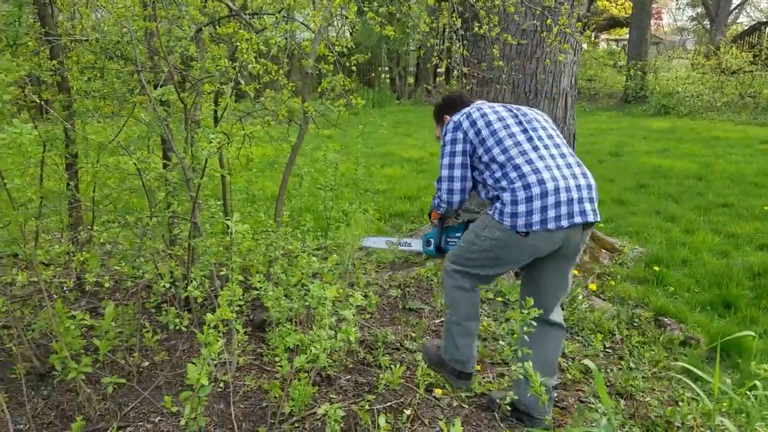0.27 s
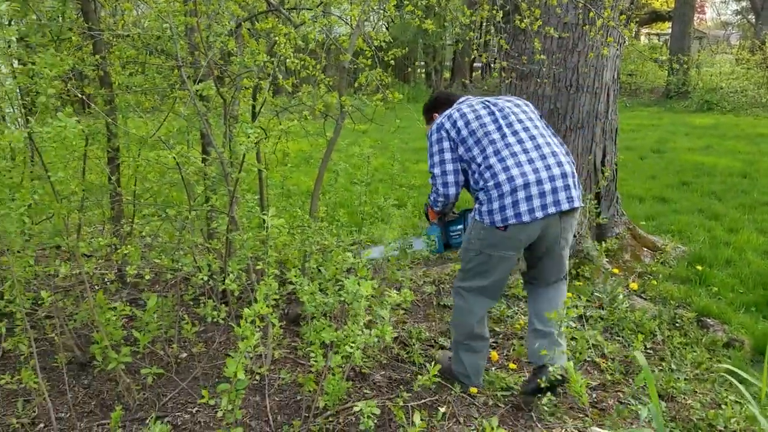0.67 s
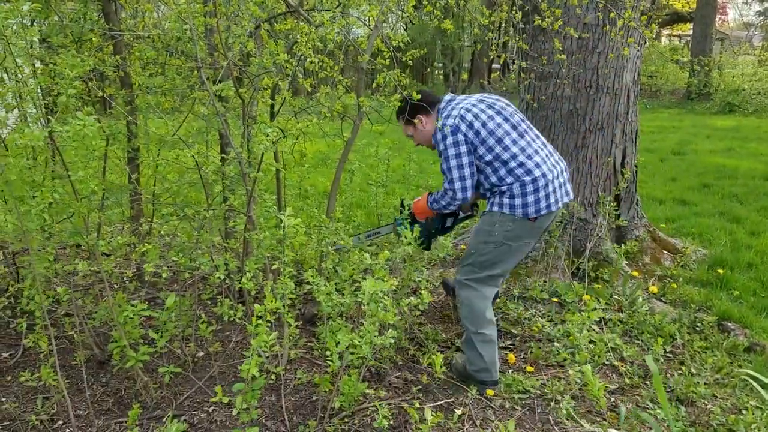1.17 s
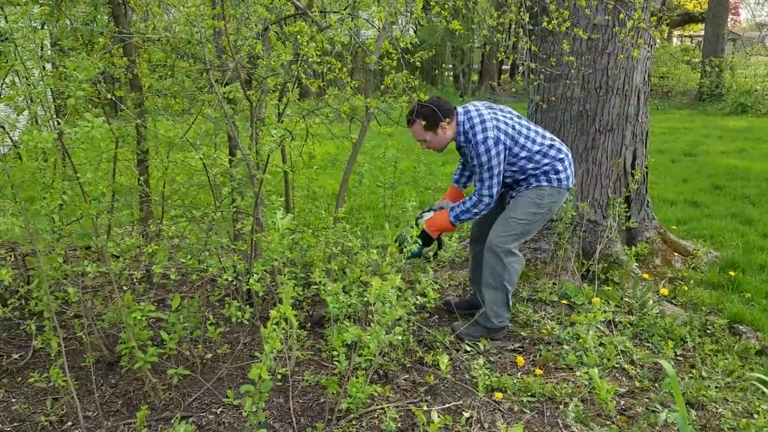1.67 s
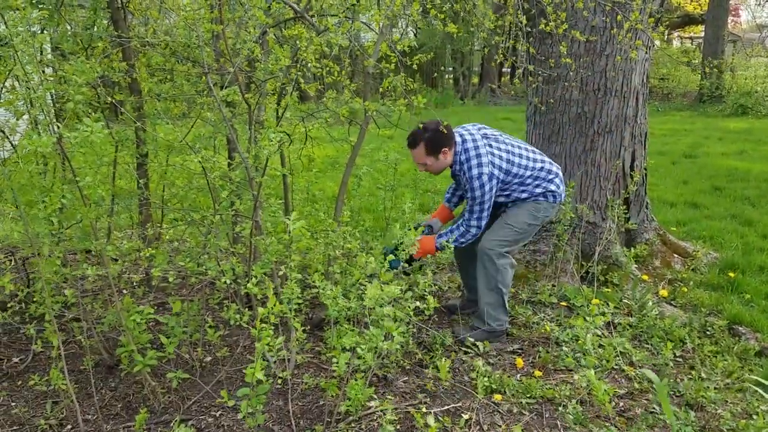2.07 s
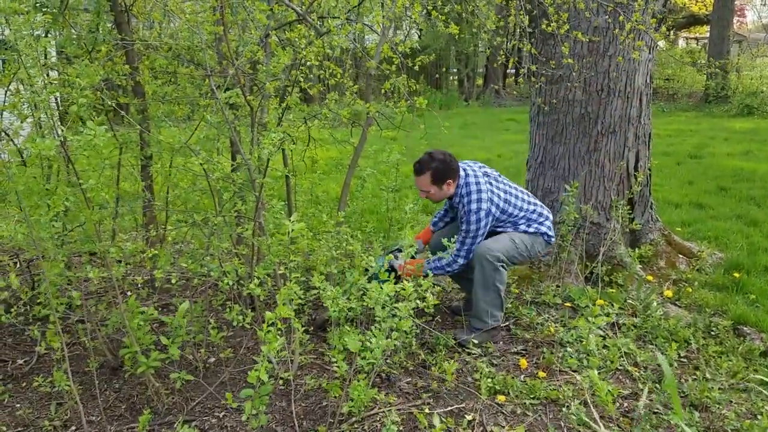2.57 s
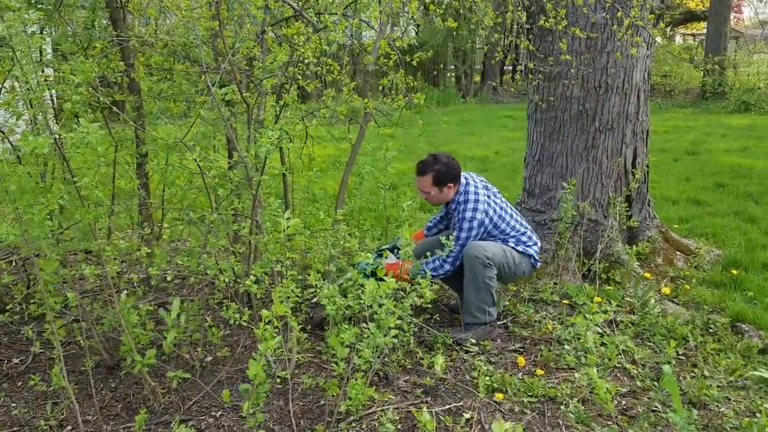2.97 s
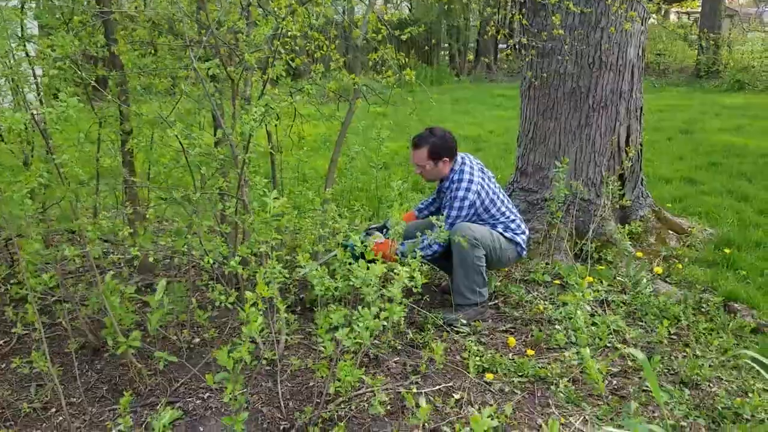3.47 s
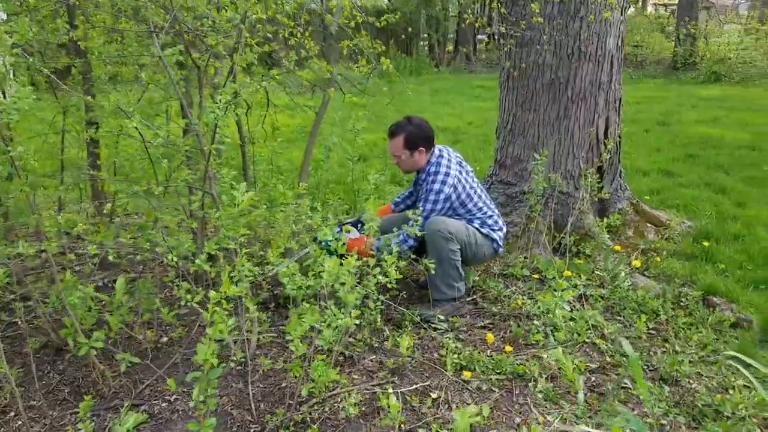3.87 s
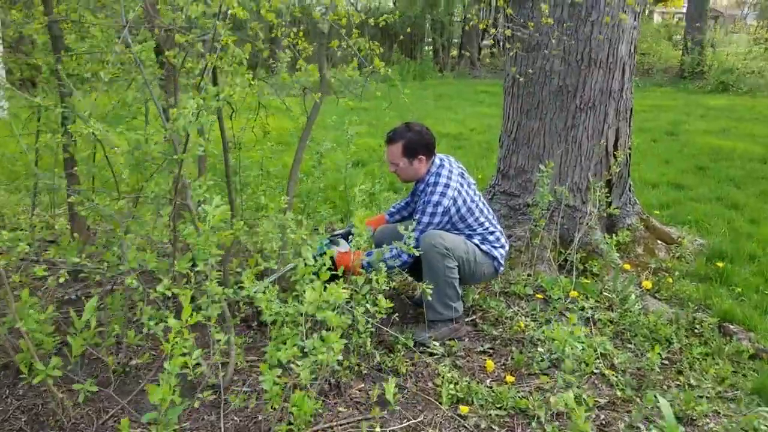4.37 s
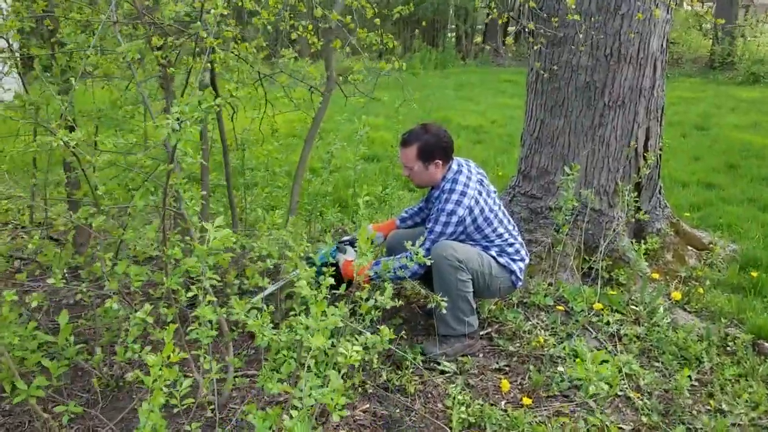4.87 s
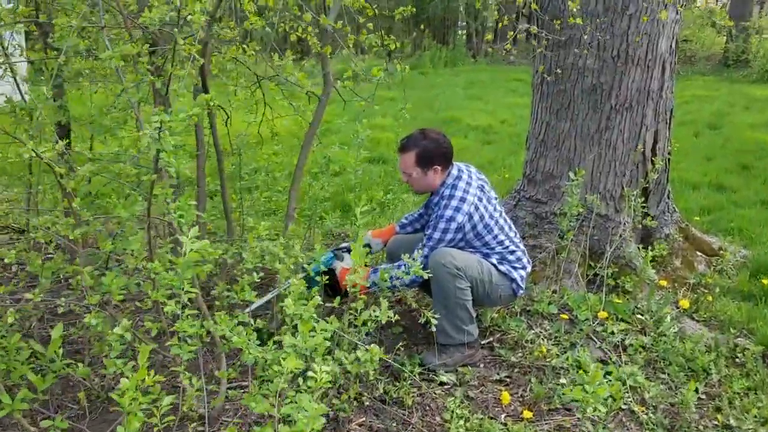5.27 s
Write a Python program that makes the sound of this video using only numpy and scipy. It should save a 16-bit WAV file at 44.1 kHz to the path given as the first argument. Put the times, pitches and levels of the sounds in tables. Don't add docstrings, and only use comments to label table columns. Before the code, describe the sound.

In a garden with light wind rumbling on the microphones, boots thud, crush dry leaves and snap twigs for about two seconds. An electric chainsaw then clicks and jolts, squeals and climbs quickly to a steady singing whine with chain rattle and bright hiss. Later it bites into thin stems, growing rougher and lower. Heard outdoors from a few metres away, in stereo.

```python
import sys
import numpy as np
from scipy import signal
from scipy.fft import rfft, irfft, next_fast_len
from scipy.io import wavfile
from scipy.ndimage import uniform_filter1d, map_coordinates

SR = 44100
rng = np.random.default_rng(int(sys.argv[2]) if len(sys.argv) > 2 else 0)


def waveform_to_disk(signal):
    frames = np.transpose(np.atleast_2d(signal))
    scaled = np.clip(frames, -1, 1) * 32767
    samples = np.round(scaled).astype(np.int16)
    wavfile.write(sys.argv[1], SR, samples)


def amplitude_ratio(level_db):
    exponent = np.asarray(level_db, float) / 20
    return 10 ** exponent


N = 243873
TIME = np.arange(N) / SR
GOVERNOR_HZ = 179.15

# (time [s], bite [0-1])
BITE = [
    (2.2, 0.21),
    (3.5, 0),
    (3.8, 0.42),
    (4.1, 0.75),
    (4.4, 0.91),
    (5.0, 1),
    (5.53, 1.09),
]
# (centre [Hz], width [Hz], level [dB])
HOUSING = [(715, 154, -11), (1043, 370, -5), (1310, 114, -0.5), (1513, 104, 1.5), (1732, 95, 4.5),
           (1880, 240, 1), (2176, 154, 1), (2415, 320, 1), (2650, 810, -7.5)]


def unit(x):
    return x / np.sqrt(np.mean(x ** 2) + 1e-20)


def along(points, hz):
    f, v = np.transpose(points)
    return np.interp(np.log(hz + 1), np.log(f + 1), v)


def curves(rows):
    s, *cols = np.transpose(rows)
    return [np.interp(TIME, s, c) for c in cols]


def swells(rows):
    return sum(amplitude_ratio(db) * np.exp(-((TIME - s) / half) ** 2) for s, db, half in rows)


def wobble(rate):
    return map_coordinates(rng.standard_normal(int(N * rate / SR) + 4), [TIME * rate])


def filtered(x, response):
    m = next_fast_len(N + SR // 4)
    return irfft(rfft(x, m) * response(np.fft.rfftfreq(m, 1 / SR)), m)[..., :N]


def modes(table):
    def response(f):
        total = 0
        for k, (centre, width, db) in enumerate(table):
            damping = 1j * f * width
            total = total + (-1) ** k * amplitude_ratio(db) * damping / (centre ** 2 - f * f + damping)
        return total
    return response


def colour(spectrum):
    return lambda hz: amplitude_ratio(along(spectrum, hz))


def grit(per_second, spread_db, noise_share, patchy_db):
    hits = rng.random((2, N)) < per_second / SR
    signs = np.sign(rng.standard_normal((2, N)))
    sizes = signs * amplitude_ratio(spread_db * np.clip(rng.standard_normal((2, N)), -2, 2))
    impacts = hits * sizes / np.sqrt(per_second / SR + 0.0016)
    noise = rng.standard_normal((2, N))
    mix = np.sqrt(1 - noise_share) * unit(impacts) + np.sqrt(noise_share) * noise
    z = signal.stft(mix, nperseg=512)[2]
    field = uniform_filter1d(rng.standard_normal(z.shape[1:]), 6, 0)
    field = uniform_filter1d(field, 12, 1)
    return signal.istft(z * amplitude_ratio(patchy_db * unit(field)), nperseg=512)[1][:, :N]


def scattered(x):
    t = np.arange(SR // 20) / SR
    tail = rng.standard_normal(len(t)) * amplitude_ratio(-60 * t / 0.011)
    return np.array([x, signal.fftconvolve(x, tail / np.linalg.norm(tail))[:N]])


def soil(hz):
    dip_hz, width_hz, depth = 7340, 1200, 0.41
    return 1 - depth * np.exp(-((hz - dip_hz) / width_hz) ** 2)


def ports(pair, alike):
    # (frequency [Hz], level difference [dB])
    shading = [(100, -2.5), (400, 0), (1200, 1), (2300, 4), (2750, 7), (3400, 0), (4400, -8), (5400, -4),
               (6100, 4), (7500, 7), (9000, 4), (10500, 0), (12000, -2), (15000, -1)]
    # (frequency [Hz], phase lead [rad])
    lead = [(1700, 0), (2150, .7), (2600, 0), (3200, -1.2), (4500, -1.4), (5300, -2.3), (7300, -3.3),
            (8200, -6.2), (9500, -4.4), (16000, -3)]

    def blend(hz):
        turn = np.arccos(np.clip(along(alike, hz), -1, 1)) / 2
        return np.array([np.cos(turn), np.sin(turn)])

    def shade(hz):
        half = amplitude_ratio(along(shading, hz) / 2) * np.exp(0.5j * along(lead, hz))
        return np.array([half, 1 / half])

    same, other = filtered(pair, blend)
    return filtered(np.array([same + other, same - other]), shade)


def shaft_hz():
    trigger_s, creep_hz_per_s, chain_on_s = 2.04, 120, 2.07
    ramp_s, ramp_hz_per_s = 2.154, 530
    knee_s, settle_s, aim_hz = 2.38, 0.15, 182
    sag_hz = 1.25
    climb = ramp_hz_per_s * (np.minimum(TIME, knee_s) - ramp_s)
    climb = aim_hz - (aim_hz - climb) * np.exp(-np.maximum(TIME - knee_s, 0) / settle_s)
    creep = np.minimum(creep_hz_per_s * (TIME - trigger_s), climb.max() / 10)
    held = GOVERNOR_HZ - sag_hz * curves(BITE)[0]
    return (TIME > chain_on_s) * np.minimum(np.maximum(creep, climb), held)


def breeze():
    # (time [s], level [dB])
    wind = [(0, -37.5), (.5, -48), (2.3, -47), (2.95, -49.5), (3.3, -60), (3.8, -52), (4.2, -57.5),
            (5.53, -53)]
    # (time [s], level [dB])
    gusts = [(0.0, -33.5), (0.05, -45), (0.21, -41), (.44, -39), (1.72, -44.5), (1.89, -45), (2.05, -46),
             (2.3, -44), (2.62, -44), (2.95, -51), (4.02, -49), (4.29, -38.5), (4.58, -47), (4.82, -42),
             (5.41, -36.5)]
    # (frequency [Hz], density [dB per Hz])
    rumble = [(12, -41), (20, -14), (59, -3.5), (91, 3.5), (134, -0.5), (172, -5), (300, -10.5),
              (390, -15.5), (660, -120)]
    # (frequency [Hz], left-right likeness [0-1])
    alike = [(30, -.1), (120, .2), (300, .4)]
    strength = amplitude_ratio(curves(wind)[0]) + swells((s, db, 0.038) for s, db in gusts)
    flutter = amplitude_ratio(1.5 + 2 * np.array([wobble(7.4), wobble(3.2)]))
    air = unit(filtered(rng.standard_normal((2, N)), colour(rumble)))
    return ports(strength * flutter * air, alike)


def far_garden():
    # (time [s], level [dB])
    swishes = [
        (0.03, -55),
        (2.27, -37),
        (4.13, -59),
    ]
    # (frequency [Hz], density [dB per Hz])
    spectrum = [(88, -19), (150, -4), (235, -11), (391, -2.5), (545, -8), (837, -4.5), (1060, -10.5),
                (1690, -17), (2270, -17), (4000, -30), (7620, -34), (9440, -24.5), (12200, -28),
                (15100, -29.5), (16000, -34)]
    duck_db, growl_db = -1, 4.5
    level_db = -45.5 + duck_db * shaft_hz() / GOVERNOR_HZ + growl_db * curves(BITE)[0]
    level = amplitude_ratio(level_db) + swells((s, db, 0.036) for s, db in swishes)
    return level * unit(filtered(grit(3000, 1, 0.86, patchy_db=2), colour(spectrum[:-1])))


def knocks():
    # (time [s], peak level [dB])
    thumps = [
        (0.019, -25),
        (0.048, -14),
        (0.219, -33),
        (2.212, -11.5),
        (.865, -36),
        (2.616, -18),
        (4.069, -10),
        (4.114, -9),
    ]
    thuds = np.zeros(N)
    for s, db in thumps:
        thuds[round(s * SR)] = amplitude_ratio(db + 14)
    return filtered(thuds, modes([(150, 26, 5.5), (400, 270, 7), (750, 500, -2)]))


def leaves():
    # (time [s], length [s], body level [dB], treble level [dB])
    scuffs = [(0.258, .02, -52, -55), (0.418, 0.027, -33, -36), (0.465, 0.087, -46, -45),
              (0.556, 0.067, -54, -57), (0.653, 0.024, -47, -56), (0.856, 0.042, -44.5, -72),
              (1.086, 0.022, -65, -49), (1.172, 0.029, -54, -46), (1.212, 0.035, -44.5, -40.5),
              (1.252, 0.042, -41.5, -43), (1.31, 0.094, -40.5, -43), (1.441, 0.072, -53, -49.5),
              (1.592, 0.048, -46.5, -53), (1.653, 0.02, -49, -40), (1.674, 0.036, -40, -37),
              (1.779, 0.035, -44.5, -43), (1.764, .006, -55, -45), (1.83, 0.055, -48, -45),
              (2.012, 0.039, -45.5, -47), (2.079, 0.032, -55, -39.5), (0.734, .02, -58, -51),
              (.385, 0.034, -60, -53)]
    body, treble = np.zeros((2, N))
    for s, length, body_db, treble_db in scuffs:
        u = np.clip((TIME - s) / length, 0, None)
        shape = (1 - np.exp(-u / 0.08)) * np.exp(-u ** 2.5)
        body += amplitude_ratio(body_db) * shape
        treble += amplitude_ratio(treble_db) * shape
    papery = modes([(1150, 500, 0), (2100, 1000, 0)])
    crisp = modes([(5500, 1800, 0), (10500, 4500, 0), (15000, 3500, -3)])
    crackle = body * unit(filtered(grit(300, 6, 0.3, patchy_db=2), papery))
    crackle += treble * unit(filtered(grit(500, 6, 0.35, patchy_db=2), crisp))
    return filtered(crackle, soil)


def twigs():
    # (time [s], peak level [dB], ring [Hz], treble level [dB])
    snaps = [(0.261, -46, 950, -16), (0.318, -45, 1190, -2), (0.424, -24.5, 2220, -10),
             (0.431, -35, 2240, -19), (0.447, -29.5, 2200, -15), (0.465, -27, 1980, -15),
             (0.497, -23, 1480, -20), (0.508, -29, 2070, -2.5), (0.525, -25.5, 2020, -11),
             (0.664, -33.5, 2000, -11), (0.856, -31, 1150, -32), (1.075, -42, 980, -4),
             (1.091, -45, 1150, -13), (1.157, -28, 2090, -7), (1.177, -27, 2130, -18),
             (1.221, -32, 1250, -8), (1.259, -20.5, 1860, -26), (1.305, -31, 1960, -20),
             (1.325, -29, 1920, -21), (1.346, -30, 1930, -22), (1.355, -28, 1860, -22),
             (1.363, -22.5, 1260, -22), (1.396, -39, 1270, -4), (1.469, -29, 1110, -27),
             (0.872, -33, 1150, -32), (1.682, -32, 2010, -14), (1.699, -17.5, 1880, -14),
             (1.785, -24.5, 902, -7.5), (1.844, -33, 1890, -15), (2.085, -39, 2600, -3)]
    thin_left_db = 3.2
    out, t = np.zeros((2, N + SR)), np.arange(SR // 16) / SR
    bright = signal.butter(2, 4000, "high", fs=SR)
    mic_peak = signal.iirpeak(5600, 3, SR)
    short, tail = amplitude_ratio(-60 * t / 0.005), amplitude_ratio(-60 * t / 0.035)
    for s, db, hz, treble_db in snaps:
        noise = rng.standard_normal((2, len(t)))
        pan_db = thin_left_db * np.log2(hz / 1200)
        gain = amplitude_ratio(db + np.array([[pan_db / 2], [-pan_db / 2]]))
        ring = np.sin(2 * np.pi * hz * t) * amplitude_ratio(-60 * t / 0.009)
        splinter = 0.92 * signal.lfilter(*bright, noise) + 2 * signal.lfilter(*mic_peak, noise)
        crack = amplitude_ratio(treble_db + 7.5) * splinter * (short + 0.08 * tail)
        crumble = 0.7 * signal.lfilter(*signal.iirpeak(hz, 1.2, SR), noise) * tail
        out[:, round(s * SR):][:, :len(t)] += gain * (ring + crack + crumble)
    return filtered(out[:, :N], soil)


def unsteady_sine(order, angle, climb):
    level = amplitude_ratio((1 + 3.5 * climb) * wobble(24.02))
    return np.sqrt(2) * level * np.sin(order * angle + 2 * np.pi * rng.random())


def sprocket(speed, angle, climb):
    # (time [s], level [dB])
    ring = [(2.27, -40), (2.315, -32), (2.37, -32), (2.4, -40), (2.47, -28), (2.55, -34), (2.6, -20.5),
            (2.72, -23.5), (2.97, -33), (3.08, -30), (3.4, -37.5), (3.56, -30.5), (3.97, -30.5), (4.1, -29),
            (4.25, -29), (4.39, -35), (4.65, -31), (5.53, -30.5)]
    awake = np.clip(speed / 80, 0, 1) ** 3
    tooth_db = -33.5 + 4 * curves(BITE)[0] - 24 * climb ** 2
    tooth = amplitude_ratio(tooth_db) * unsteady_sine(6, angle, climb)
    return awake * (tooth + amplitude_ratio(curves(ring)[0]) * unsteady_sine(12, angle, climb))


def motor_orders(speed, angle, climb):
    # (shaft multiple, free running level [dB], cutting level [dB])
    orders = [(2, -60, -52), (3, -60, -49), (4, -60, -52), (5, -60, -47), (7, -39, -42), (9, -44, -36),
              (10, -42, -42), (11, -41, -39), (13, -60, -40), (15, -52, -42), (18, -45, -36.5),
              (21, -45, -60), (24, -49, -44), (30, -37, -41), (36, -44, -48), (45, -53, -49),
              (48, -50, -48)]
    (bite,) = curves(BITE)
    pull = amplitude_ratio(7 * climb) * np.clip(speed / 110, 0, 1) ** 2
    late = (speed / speed[-1]) ** 4.5

    def swell(hz):
        return np.sqrt(0.19 + np.abs(modes(HOUSING)(hz)))

    out = np.zeros(N)
    for order, free_db, cut_db in orders:
        level = amplitude_ratio(free_db + (cut_db - free_db) * bite)
        level = level * swell(order * speed) / swell(order * speed[-1])
        out += level * (pull if order <= 18 else late) * unsteady_sine(order, angle, climb)
    return out


def start_squeal(angle):
    # (time [s], level [dB], half length [s])
    squeals = [
        (2.209, -18, 0.0098),
        (2.226, -18, .004),
        (2.257, -15, 0.0083),
    ]
    slots = 48
    return swells(squeals) * (1.2 * np.sin(slots * angle) + 0.058 * np.sin(2 * slots * angle))


def tones():
    speed = shaft_hz()
    angle = 2 * np.pi * np.cumsum(speed * (1 + 0.00047 * wobble(25.29))) / SR
    climb = np.clip(1 - speed / speed[-1], 0, 1) ** 0.5
    strikes_per_turn = 0.962
    strikes = amplitude_ratio(-72 + 26.4 * curves(BITE)[0]) * unsteady_sine(strikes_per_turn, angle, climb)
    return sprocket(speed, angle, climb) + motor_orders(speed, angle, climb) + strikes + start_squeal(angle)


def jolts():
    # (time [s], peak level [dB], ring [Hz])
    links = [
        (2.073, -30.5, 2650),
        (2.087, -24, 1010),
        (2.0954, -25, 890),
        (2.1047, -22, 1830),
        (2.1164, -19.5, 2620),
        (2.124, -23, 1190),
        (2.1404, -24, 1040),
        (2.153, -18.5, 2650),
        (2.1747, -23, 2580),
        (2.1894, -23, 1260),
    ]
    out, t = np.zeros(N), np.arange(SR // 20) / SR
    for s, db, hz in links:
        attack = 1 - np.exp(-t / 0.00052)
        out[round(s * SR):][:len(t)] += amplitude_ratio(db - 60 * t / 0.021) * np.sin(2 * np.pi * hz * t) * attack
    return out


def chain_level(db, grows, idle=0):
    # (time [s], level [dB])
    facing = [(2.2, 0), (2.55, 0.5), (2.65, 1), (2.8, 0.5), (3.2, 1), (3.5, -0.2), (4.0, 1.5), (4.8, 0.5),
              (5.53, 1.2)]
    pace = np.maximum(shaft_hz() / GOVERNOR_HZ - idle, 0)
    return amplitude_ratio(db + curves(facing)[0]) * pace ** grows


def rattle():
    speed = shaft_hz()
    pace = speed / GOVERNOR_HZ
    slack = (1 - pace) * np.clip(pace / 0.2, 0, 1)
    level = chain_level(-28.5 + 3.5 * curves(BITE)[0] + 10.5 * slack, 0.53)
    return level * unit(filtered(grit(14 * speed, 3.4, 1, patchy_db=0.7), modes(HOUSING)))


def scrape_and_hiss():
    # (frequency [Hz], density [dB per Hz])
    scraping = [(2300, -35), (2600, -1.5), (2900, -9.5), (3250, -5.5), (3500, -5), (3900, -5.5),
                (4400, -5.5), (5000, -6), (5400, -3), (5900, -5), (6500, -9), (7200, -5), (8500, -18)]
    # (frequency [Hz], density [dB per Hz])
    hissing = [(3820, -22), (6500, -4.5), (7250, -8.5), (8490, -0.5), (8990, 3), (12600, -2.5), (15100, -4),
               (16000, -10)]
    # (centre [Hz], half width [Hz])
    notches = [(3100, 85), (5860, 41), (3440, 120), (7030, 540)]
    speed, (bite,) = shaft_hz(), curves(BITE)
    taut = 0.043
    scrape = unit(filtered(grit(25 * speed, 5.5, 0.45, patchy_db=2), colour(scraping)))
    hiss = unit(filtered(grit(40 * speed, 5.4, 0.67, patchy_db=0), colour(hissing[:-1])))
    hiss_db = -25 + 4.5 * np.abs(bite) ** 0.53 + 1.3 * wobble(13)
    bright = chain_level(-32 + 3.5 * bite, 0.65, taut) * scrape + chain_level(hiss_db, 0.97, taut) * hiss

    def dips(hz):
        return sum(np.exp(-((hz - centre) / half) ** 2) for centre, half in notches)

    return bright - (0.6 - 0.46 * bite) * filtered(bright, dips)


def growl():
    # (frequency [Hz], density [dB per Hz])
    spectrum = [(53, -15), (90, -3.5), (173, -12.5), (259, -14.5), (354, -10), (465, -34), (525, -15.5),
                (1000, -8.5), (1300, -46), (2200, -120)]
    speed = shaft_hz()
    level = amplitude_ratio(-53 + 16.5 * curves(BITE)[0]) * speed / speed[-1]
    return level * unit(filtered(grit(600, 12, 0.58, patchy_db=-1.5), colour(spectrum)))


def scene():
    # (frequency [Hz], left-right likeness [0-1])
    far_alike = [(60, 0.96), (300, 0.93), (2000, 0.067), (5000, 0.11), (15000, 0.054)]
    near_alike = [(100, .55), (250, .8), (500, .96), (1200, .94), (2200, .62), (4000, .4), (5500, .6),
                  (7300, .45), (9000, .28), (15000, .15)]
    tone_alike = [(100, .99), (3000, .97), (9000, .85)]
    surroundings = breeze() + ports(far_garden() + leaves(), far_alike) + twigs()
    blows = scattered(knocks() + jolts())
    chain = rattle() + scrape_and_hiss() + growl()
    return surroundings + ports(blows + chain, near_alike) + ports(scattered(tones()), tone_alike)


def low_pass(x):
    return signal.sosfilt(signal.butter(12, 17070, fs=SR, output="sos"), x)


def record(dry):
    mix = filtered(dry, lambda hz: hz < 15750)
    return low_pass(mix)


dry = scene()
out = record(dry)
waveform_to_disk(out)
```